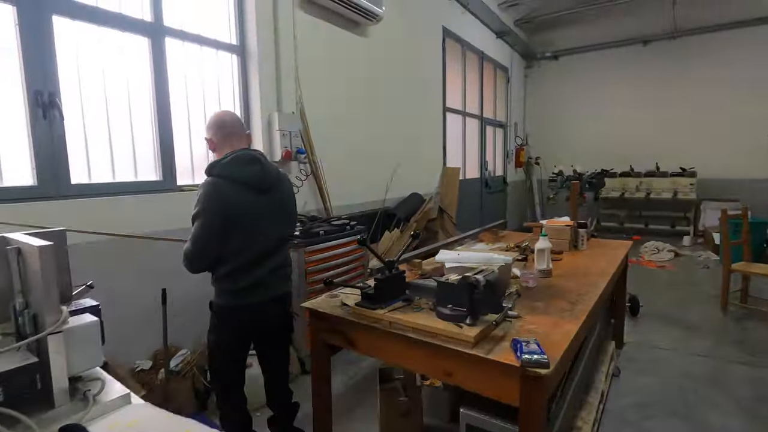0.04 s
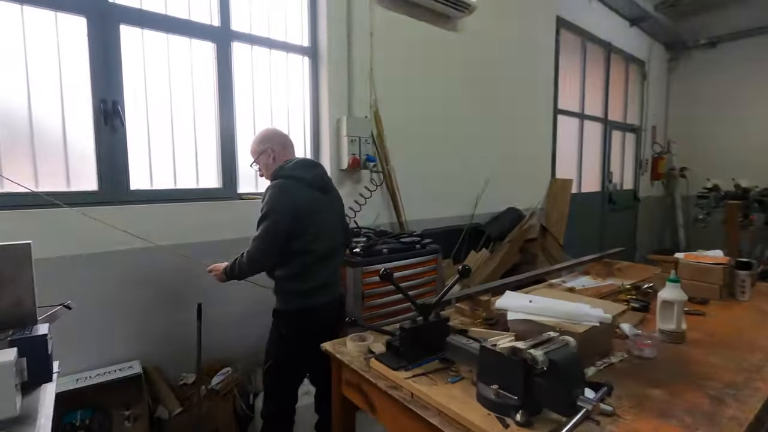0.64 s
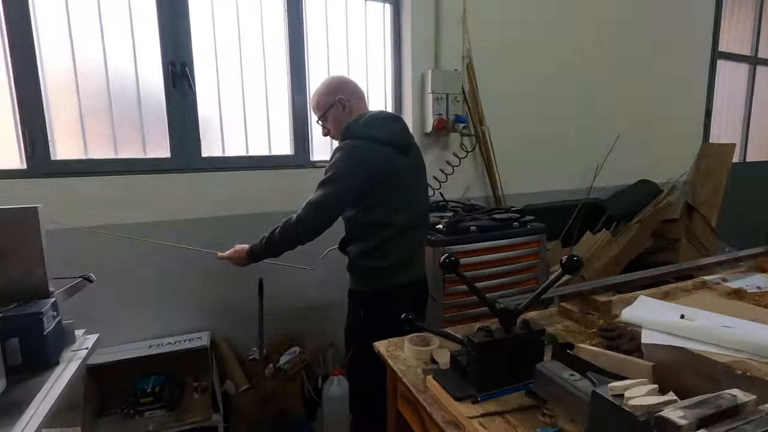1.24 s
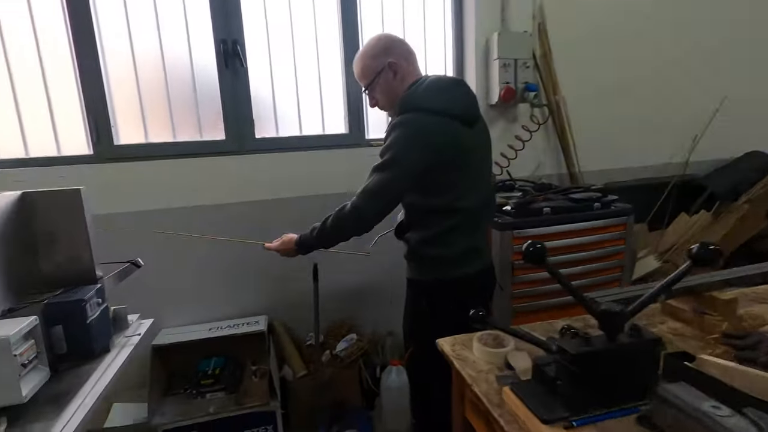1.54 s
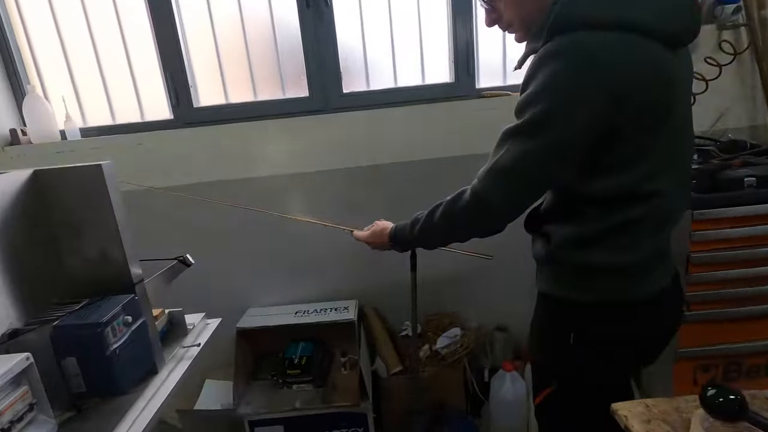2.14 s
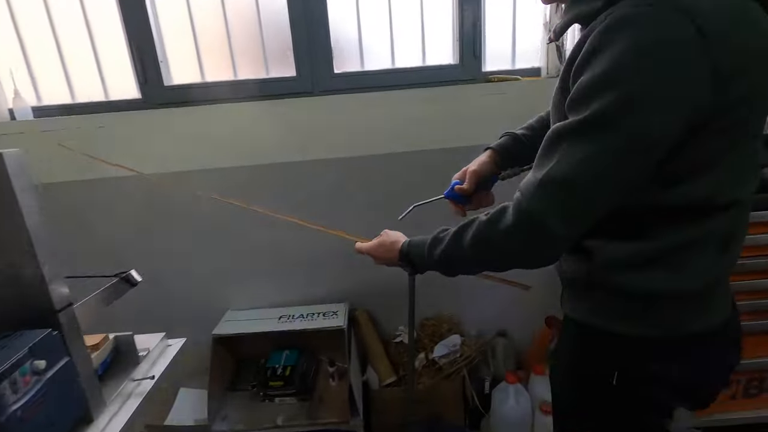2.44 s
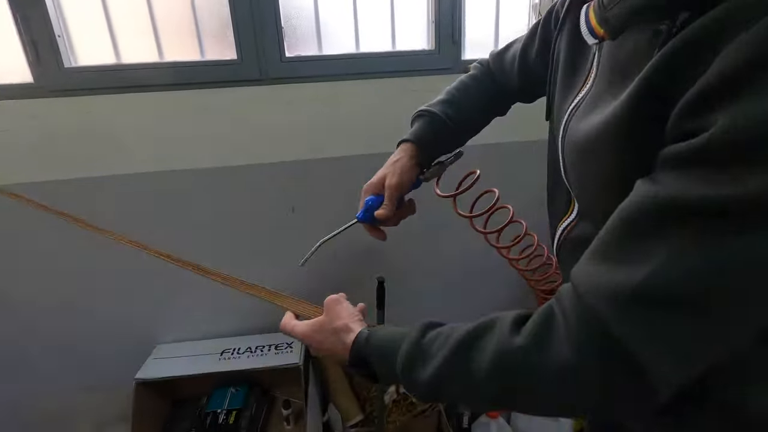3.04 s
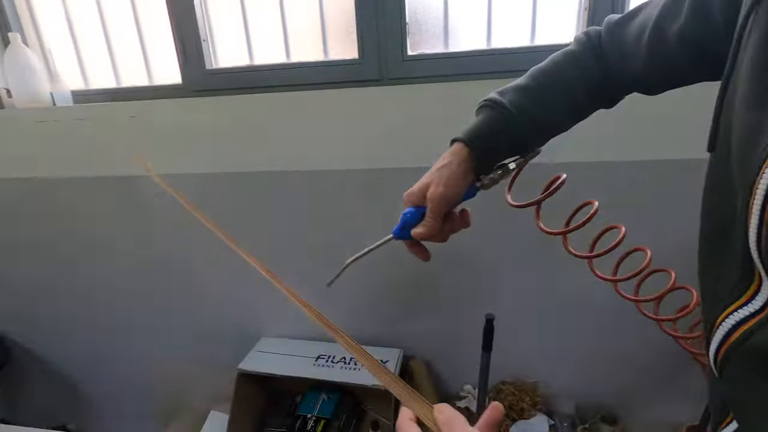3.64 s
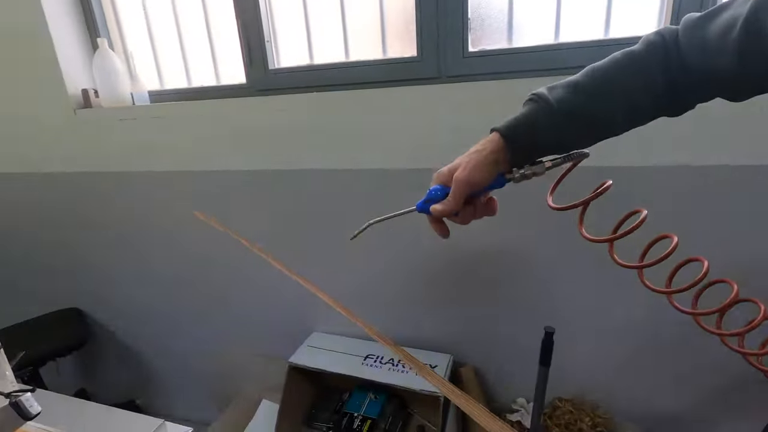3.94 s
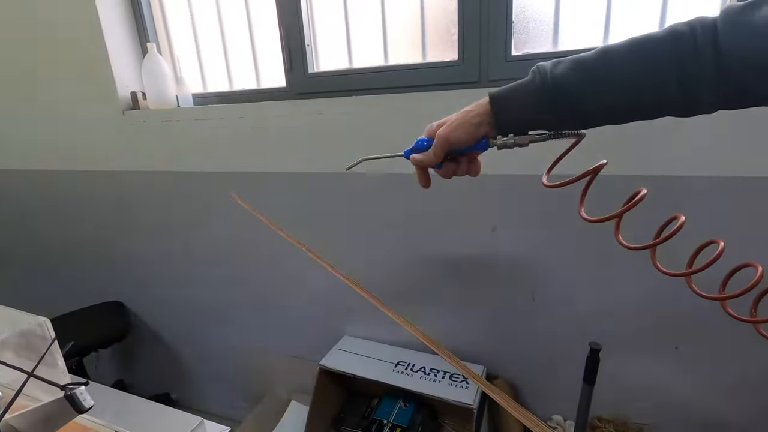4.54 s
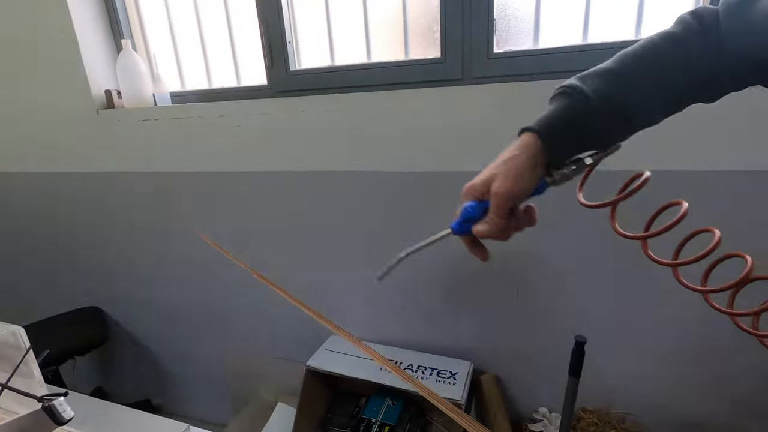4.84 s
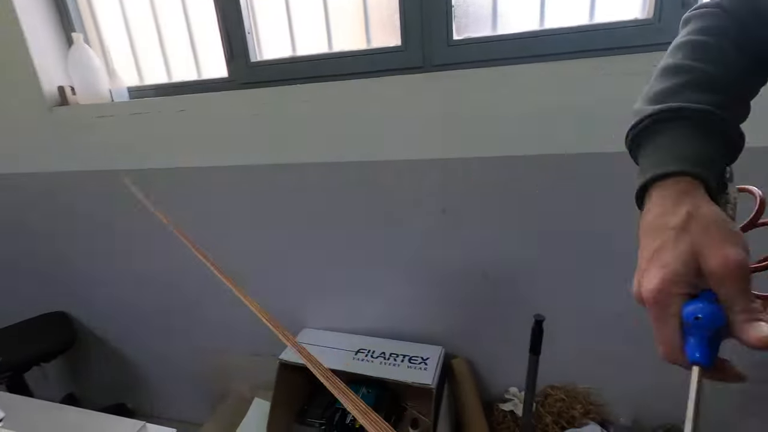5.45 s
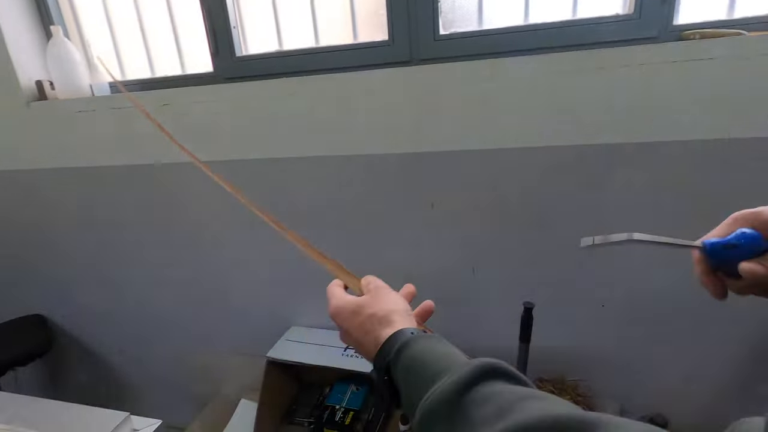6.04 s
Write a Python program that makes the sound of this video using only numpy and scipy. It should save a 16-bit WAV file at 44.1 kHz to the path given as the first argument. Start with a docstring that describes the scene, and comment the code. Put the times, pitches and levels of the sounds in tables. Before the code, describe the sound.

Soft footsteps, sole scuffs and a few light clicks of bamboo come first, over a faint low room drone. Then an air gun starts with a thin leak and blasts steadily for about four seconds, its bright hiss wavering between a rush and a lower roar as it passes over bamboo strips and a hand. Puffs of air thump the nearby microphone late on, and the jet stops with a short workshop echo.

```python
"""First you hear steps and scuffs in a hard-walled workshop, and bamboo strips tapping together.
Then a compressed-air blow gun leaks as its trigger is eased, and blasts as it is pressed home.
Swept along the strips, the jet makes swirls of air: tiny ones hiss at the nozzle, bigger ones rush
across the strips and roar over strips and hand, and the biggest rumble. Stray puffs buffet the
microphone. A low drone lies under it all, and the room rings on when the jet stops."""
import sys
import numpy as np
from scipy import signal
from scipy.io import wavfile
from scipy.ndimage import map_coordinates

SR = 44100
rng = np.random.default_rng(int(sys.argv[2]) if len(sys.argv) > 2 else 0)


def persist_wave(psi):
    """Save psi, clipped to +-1, as 16-bit WAV."""
    counts = np.round(np.clip(psi, -1, 1) * 32767).astype(np.int16)
    wavfile.write(sys.argv[1], SR, np.atleast_2d(counts).T)


N = 277477
TIME = np.arange(N) / SR
CONTROL_STEP = 40   # samples between updates of slow changes
CONTROL_TIME = TIME[::CONTROL_STEP]
PRESS_S, OPEN_S, RELEASE_S, SHUT_S = 1.714, 0.032, 5.984, 0.045   # trigger moments, valve travel times

# how alike the microphone's left and right sides hear a noise: pitch_hz, likeness (0-1)
LIKENESS = [(100, .9), (450, .92), (1200, .98), (2500, .95), (5000, .8), (7000, .72), (10000, .35),
            (14000, .3)]
# which side hears more: pitch_hz, left_minus_right_db
BALANCE = [(200, -1), (1200, -2), (3000, 1), (5000, -1.5), (7500, 2), (10000, -9), (12500, -4.5),
           (15000, -2)]
# the room's low drone (every spectrum gives only a tone colour): pitch_hz, level_db
DRONE_SPECTRUM = [(20, -3), (48, -7), (80, -23), (105, -49), (135, -4), (184, -2), (280, -8.5), (520, -19),
                  (850, -24), (1650, -24), (4000, -26), (8300, -29.5), (10500, -48), (14000, -52)]
# the drone fades as the microphone moves across the room: time_s, level_db
DRONE_LEVEL = [(0, -61), (1.5, -64.5), (6, -68)]
# how long the room rings (a ring time is a fall of 60 dB): pitch_hz, ring_s
ROOM_RING = [(150, 0.83), (600, 1.07), (1500, 1.17), (4000, 0.94), (8000, 0.75), (14000, 0.28)]

# air tumbling over the microphone: pitch_hz, level_db
BUFFET_SPECTRUM = [(20, 1), (55, 4), (110, -2.5), (180, -1), (400, -20.5), (900, -50)]
# puffs on the microphone, faint as it is carried, then from the jet: time_s, length_s, level_db
GUSTS = [(.11, 0.12, -68), (.46, .1, -57), (2.82, 0.063, -50), (3.01, 0.075, -50.5), (3.24, 0.033, -41),
         (3.33, 0.054, -55), (3.46, 0.056, -55), (3.84, 0.068, -58), (4.9, 0.13, -62), (5.15, .1, -41),
         (5.156, 0.034, -30), (5.222, 0.035, -34), (5.29, .05, -53), (5.51, 0.065, -44), (5.64, 0.25, -53),
         (5.79, 0.083, -48), (6.0, 0.042, -53)]

# soles scuff on concrete, each with its own pitch: time_s, length_s, level_db, pitch_hz
SCUFFS = [(0.014, 0.069, -43.5, 2230), (.058, 0.03, -48, 2700), (.14, 0.17, -54.5, 1790),
          (0.387, 0.03, -57, 2800), (.457, 0.047, -51, 3120), (0.65, 0.071, -50, 2480),
          (0.848, 0.05, -55.5, 2000), (.9, 0.066, -49, 1970), (0.954, 0.036, -43.5, 4200),
          (.998, 0.02, -44.5, 1750), (1.035, .05, -51.5, 1700), (1.15, 0.11, -63, 1700)]
# a rubbing sole: pitch_hz, level_db
SCUFF_SPECTRUM = [(800, -18), (1250, -1.5), (1650, -2.5), (2100, -3), (2700, -3), (4200, -6), (6400, -22)]
# grit scrapes under a sole: time_s, length_s, level_db
SCRAPES = [(.02, 0.095, -59), (.3, .02, -63.5), (.43, 0.022, -54.5), (.519, 0.028, -52.5),
           (.59, 0.094, -59), (.955, 0.027, -48.5), (1.005, 0.04, -44), (1.17, 0.063, -63)]
# scraping grit: pitch_hz, level_db
SCRAPE_SPECTRUM = [(200, -3), (350, -5), (600, -0.5), (800, -4.5), (1200, -3), (2000, -10)]
# sleeves swish: time_s, length_s, level_db
SWISHES = [(.02, 0.11, -56.5), (.322, 0.065, -58), (.42, 0.085, -59), (.74, 0.43, -67.5), (.96, 0.082, -58)]
# rubbing cloth: pitch_hz, level_db
SLEEVE_SPECTRUM = [(2000, 2), (4000, 1), (6400, 0), (8200, -3), (10000, -21), (12700, -18), (16000, -32)]
# bamboo strips tap each other: time_s, strength_db
BAMBOO_TAPS = [(0.567, -32.5), (0.625, -34), (0.931, -28.5), (0.938, -33), (0.988, -30.5)]
# the tones of a strip: pitch_hz, level_db, ring_s
BAMBOO_TONES = [(1390, -19, 0.014), (1710, -4.5, 0.0097), (2170, -9.5, .01), (2640, -7.5, 0.0034),
                (3600, -11, 0.0033), (4850, -16, 0.0034)]
# the hose coupling ticks as the gun is picked up: time_s, strength_db
COUPLING_TICKS = [(1.377, -59)]
# the tones of the coupling: pitch_hz, level_db, ring_s
COUPLING_TONES = [(3700, -4, .005), (5230, 2, 0.004), (8500, -1, .01), (10800, -18, 0.0091),
                  (11940, -7, .03)]
# a metal part is bumped: time_s, strength_db
METAL_BUMPS = [(0.988, -52)]
# the faint tones of that part: pitch_hz, level_db, ring_s
METAL_TONES = [(1400, -11, 0.67), (1750, -8, 0.7)]
# footfalls, heel then sole: time_s, strength_db
STEPS = [(0.425, -34), (0.452, -47), (0.508, -35.5)]
# the tones of the floor: pitch_hz, level_db, ring_s
FLOOR_TONES = [(48, -18, 0.16), (157, -8.5, 0.08), (200, -2.5, 0.1), (292, -15, 0.069), (437, -15, 0.034)]

# where the nozzle is heard: time_s, left_delay_ms, left_minus_right_db
NOZZLE_PATH = [(1.5, 0.034, -0.5), (2.2, 0.041, -0.8), (2.8, 0.024, 1.5), (3.15, 0.0086, 0.5),
               (3.37, .002, 1), (3.65, 0.024, 0.5), (5.03, 0.035, -0.2), (5.12, 0.046, -3),
               (5.26, 0.05, -1.5), (5.36, 0.025, 0.5), (5.549, 0.035, -1), (5.999, 0.036, -.5)]
# air leaks through the barely open valve: time_s, level_db
LEAK_LEVEL = [(1.51, -77), (1.55, -54), (1.585, -40.5), (1.615, -42), (1.632, -43.5), (1.655, -37.5),
              (1.705, -41), (1.76, -34.5), (2.1, -27), (2.3, -49)]
# the leaking air: pitch_hz, level_db
LEAK_SPECTRUM = [(630, -18), (1000, -23), (1280, -3), (1700, -5.5), (2400, -2.5), (3200, 0), (4700, -1.5),
                 (6500, -2.5), (8300, -7), (12500, -19), (16000, -28)]
# pitches at which the valve and nozzle tube ring: pitch_hz, width_hz, level_db
TUBE_PEAKS = [(2380, 160, 4), (3660, 180, 3), (4600, 360, 6), (5660, 180, -17)]
# the jet wavers as the hand moves and steadies while held clear: time_s, waver_factor
HAND_MOTION = [(4.1, 1.1), (4.25, 0.35), (4.8, .25), (4.95, 1)]
# the fine hiss at the nozzle: time_s, level_db
HISS_LEVEL = [(1.75, -31), (1.95, -31), (1.97, -29), (2.53, -33.5), (2.66, -26.5), (2.7, -35),
              (2.77, -28.5), (2.85, -36.5), (3.0, -25), (3.09, -34.5), (3.12, -27), (3.16, -30.5),
              (3.21, -26), (3.23, -37.5), (3.24, -28.5), (3.3, -36), (3.32, -31), (3.36, -39.5),
              (3.41, -24.5), (3.42, -28.5), (3.45, -28.5), (3.5, -44.5), (3.58, -38), (3.61, -33.5),
              (3.73, -34.5), (3.81, -26.5), (3.97, -33.5), (4.19, -34.5), (4.73, -32.5), (4.99, -29),
              (5.0, -28.5), (5.06, -34), (5.1, -30.5), (5.27, -27.5), (5.31, -36), (5.49, -30),
              (5.6, -37.5), (5.68, -27), (5.75, -29), (5.79, -36.5), (5.9, -35), (5.92, -33), (5.95, -38),
              (5.98, -30), (6.0, -32)]
# the hiss: pitch_hz, level_db
HISS_SPECTRUM = [(1000, -16), (3000, -15), (5000, 3), (6400, 0), (8200, 3.5), (10000, -6.5), (12900, -6.5),
                 (16000, -46)]
# the rush of the jet, which drops whenever the nozzle turns away: time_s, level_db
RUSH_LEVEL = [(1.75, -22), (1.94, -25.5), (2.0, -22.5), (2.25, -24.5), (2.55, -23), (2.85, -25),
              (3.05, -26), (3.2, -28), (3.23, -30.5), (3.45, -23.5), (3.5, -37.5), (3.578, -35.5),
              (3.603, -26.5), (3.73, -31), (3.79, -26), (3.87, -25.5), (3.975, -26.5), (4.005, -30.5),
              (4.2, -29), (4.7, -29.5), (5.0, -24.5), (5.13, -23), (5.16, -25), (5.295, -26.5),
              (5.32, -29.5), (5.393, -29), (5.412, -27), (5.5, -26), (5.6, -25.5), (5.75, -25),
              (5.81, -25.5), (6.0, -24.5)]
# the rush: pitch_hz, level_db
RUSH_SPECTRUM = [(500, -38), (900, -39), (1500, -12), (2300, -0.5), (3300, 1.5), (4800, 1), (6200, -7.5),
                 (9000, -13)]
# the roar, louder when more air lands on strips and hand: time_s, level_db
ROAR_LEVEL = [(1.75, -38.5), (1.93, -45.5), (2.25, -32), (2.5, -29), (2.8, -27), (3.0, -30.5), (3.2, -29.5),
              (3.44, -35.5), (3.52, -51.5), (3.63, -34), (3.75, -39.5), (3.92, -32), (3.988, -32),
              (4.005, -43), (4.15, -34), (4.25, -39), (4.75, -38.5), (4.92, -33), (5.0, -29), (5.12, -40),
              (5.29, -35), (5.33, -41.5), (5.39, -37), (5.412, -30.5), (5.55, -30), (5.78, -27.5),
              (5.92, -31.5), (5.95, -39.5), (5.98, -30.5)]
# the roar: pitch_hz, level_db
ROAR_SPECTRUM = [(400, -17.5), (640, -9.5), (800, -14.5), (1050, 0), (1650, 3), (2400, 0.5), (4000, -38)]
# peaks that make the roar sound hollow: pitch_hz, width_hz, level_db
HOLLOW_PEAKS = [(689, 44, 1), (1110, 270, -5), (2040, 480, -10.5)]
# the rumble of the wake, the slow, wide end of the jet: time_s, level_db
WAKE_LEVEL = [(1.75, -58), (2.1, -46.5), (2.62, -39), (2.85, -41.5), (3.25, -47), (3.4, -51), (3.53, -63),
              (3.65, -49.5), (3.87, -52.5), (3.98, -42), (4.04, -48.5), (4.12, -41), (4.3, -44.5),
              (4.74, -46), (4.86, -38.5), (4.95, -34.5), (5.05, -43.5), (5.35, -47.5), (5.47, -44),
              (5.62, -36), (5.85, -37), (5.95, -49), (6.0, -34)]
# the wake: pitch_hz, level_db
WAKE_SPECTRUM = [(80, -31), (125, -29), (165, -4), (240, -4.5), (310, 0.5), (400, -2.5), (510, -5.5),
                 (660, 2.5), (820, -1.5), (1300, -7)]
# the jet flicks across a strip, high on an edge, low on a flat: time_s, length_s, lift_db, pitch_hz
WHOOSHES = [(2.115, 0.056, 2.5, 3630), (2.518, 0.02, 3, 606), (2.707, 0.03, 7, 1190),
            (2.792, 0.064, 3, 3000), (2.898, 0.033, 8, 700), (2.986, 0.16, 1.5, 5000),
            (3.152, 0.05, 7, 4800), (3.204, 0.027, 7.5, 7000), (3.256, 0.021, 7, 5500),
            (3.323, 0.04, 7.5, 4800), (3.384, 0.03, 3.5, 4600), (3.428, 0.047, -0.5, 5000),
            (3.602, 0.042, 4.5, 3730), (3.676, 0.048, 7, 2480), (3.807, 0.15, 3.5, 7000),
            (3.975, 0.035, 4, 1400), (4.1, 0.041, 6, 970), (5.055, 0.15, 3.5, 3020),
            (5.202, 0.027, 7, 4500), (5.282, 0.058, 6.5, 3900), (5.452, 0.087, 6.5, 3520),
            (5.536, 0.04, 4.5, 1200), (5.708, .07, 5.5, 5500), (5.763, 0.022, 4.5, 2400),
            (5.837, 0.038, 4, 450), (5.917, 0.028, 6, 3200), (5.989, .035, 5, 3270)]
# the ring of the gap between nozzle and strips glides: start_s, end_s, start_hz, end_hz, lift_db
GAP_SWEEPS = [(2.466, 2.633, 686, 605, 5), (2.67, 2.73, 1100, 1900, 1.5), (2.785, 2.905, 3200, 1200, 1.8),
              (2.913, 3.062, 2380, 5000, 4), (3.35, 3.422, 3480, 4500, 5), (3.78, 3.92, 4670, 3480, 3.5),
              (3.923, 3.995, 3000, 1400, 2), (4.84, 4.97, 604, 760, 3), (4.947, 5.146, 1340, 5000, 2),
              (5.407, 5.512, 2400, 2800, 4), (5.513, 5.69, 1730, 1550, 5), (5.752, 5.857, 2200, 480, 3)]


def from_db(db):
    """Turn decibels into a gain to multiply by."""
    return 10 ** (np.asarray(db) / 20)


def rms_one(x):
    """Scale a signal so that its average strength (rms) is 1."""
    return x / np.sqrt(np.mean(x ** 2) + 1e-20)


def at_hz(points, hz):
    """Read a table at one pitch, giving every octave equal room."""
    pitches, values = np.transpose(points)
    return np.interp(np.log(hz), np.log(pitches), values)


def curve(rows):
    """Join a table's points with straight lines, read at the control times."""
    return np.interp(CONTROL_TIME, *np.transpose(rows))


def held(control):
    """Hold each control value until the next, giving one value a sample."""
    return np.repeat(control, CONTROL_STEP)[:N]


def drift(rate_hz):
    """A smooth random wobble of size 1 at the control times; a higher rate wobbles faster."""
    memory = np.exp(-2 * np.pi * rate_hz * CONTROL_STEP / SR)
    warm_up = 2000
    white = rng.standard_normal(len(CONTROL_TIME) + warm_up)
    return rms_one(signal.lfilter([1], [1, -2 * memory, memory * memory], white)[warm_up:])


def wander(spread_db, rate_hz):
    """A factor that wavers around 1 by chance."""
    return held(from_db(spread_db * drift(rate_hz)))


def bell(offset, width):
    """A smooth hump of height 1, its width taken at half height."""
    return .5 ** ((2 * offset / width) ** 2)


def swells(events):
    """The gain of short sounds that each swell and fade."""
    return held(sum(from_db(db) * bell(CONTROL_TIME - s, length) for s, length, db in events))


def delayed(x, seconds):
    """Make a signal arrive later, by a delay that can change."""
    return map_coordinates(x, [np.arange(N) - seconds * SR], order=3)


def bands(low_hz, high_hz):
    """Filters that cut a range into slices a third of an octave wide, each with its middle pitch."""
    centres = 20 * 2 ** (np.arange(30) / 3)
    half = 2 ** (1 / 6)
    return [(hz, signal.butter(2, [hz / half, hz * half], "band", fs=SR, output="sos"))
            for hz in centres if low_hz / half <= hz <= high_hz * half]


def noise(spectrum, flutter_db, patchy_db, flutter_hz=25, shared=1, stretch=1):
    """Stereo noise whose bands waver together (flutter) and alone (patchy); stretch moves its pitch."""
    out = np.zeros((2, N), np.float32)
    white = rng.standard_normal((2, 2, N), dtype=np.float32)
    together = from_db(flutter_db * drift(flutter_hz)) / np.sqrt(stretch)
    for k, (hz, band) in enumerate(bands(spectrum[0][0], spectrum[-1][0])):
        alike = np.clip(at_hz(LIKENESS, hz) * shared, 0, 1)   # the two sides share less of a far source
        mid, side = np.sqrt(1 + alike), np.sqrt(1 - alike)
        balance = from_db(at_hz(BALANCE, hz) * np.array([[.5], [-.5]]))
        to_stereo = np.array([[mid, side], [mid, -side]]) * balance
        gain = together * from_db(at_hz(spectrum, hz / stretch) + patchy_db * drift(9.9))
        band_noise = np.float32(signal.sosfilt(band, white[k % 2]))
        out += held(np.float32(gain)) * (np.float32(to_stereo) @ band_noise)
    return rms_one(out.astype(float))


def coloured(x, peaks):
    """Make a noise ring at a few pitches, then scale it to strength 1."""
    out = x.copy()
    for hz, width_hz, db in peaks:
        out += from_db(db) * signal.lfilter(*signal.iirpeak(hz, hz / width_hz, fs=SR), x)
    return rms_one(out)


def struck(blows, tones, scatter_db):
    """Each blow sets all of an object's tones ringing; scatter varies their strengths by chance."""
    times_s, blow_db = np.transpose(blows)
    strengths = from_db(blow_db[:, None] + scatter_db * rng.standard_normal((len(blows), len(tones))))
    out = np.zeros(N)
    for k, (hz, tone_db, ring_s) in enumerate(tones):
        clicks = np.full(N, 1e-18)
        clicks[(times_s * SR).astype(int)] = strengths[:, k] * from_db(tone_db) * (-1) ** k
        decay, turn = from_db(-60 / (ring_s * SR)), 2 * np.pi * hz / SR
        out += signal.lfilter([0, np.sin(turn)], [1, -2 * decay * np.cos(turn), decay * decay], clicks)
    return out


def room_drone():
    """The room's low, wavering drone slowly fades."""
    level = held(from_db(curve(DRONE_LEVEL)))
    return level * noise(DRONE_SPECTRUM, flutter_db=2.5, patchy_db=3.0, shared=0.27)


def room_response(build_s):
    """The room's answer to a click: echoes build up, then die away, the highest pitches first."""
    t = TIME[:SR]
    white = rng.standard_normal((2, 2, len(t)))
    tail = np.zeros((2, len(t)))
    for k, (hz, band) in enumerate(bands(100, 16000)):
        mid, side = signal.sosfilt(band, white[k % 2])
        alike = 0.8 / (1 + (hz / 3000) ** 2)   # the two sides are close and hear long waves alike
        stereo = np.sqrt(1 + alike) * mid + np.sqrt(1 - alike) * np.array([side, -side])
        tail += stereo * from_db(-60 * t / at_hz(ROOM_RING, hz))
    return rms_one(tail * (1 - np.exp(-t / build_s))) / np.sqrt(len(t))


def workshop_echoes(x, left_db, right_db, first_echo_s, sway_db, patterns=4):
    """As source and microphone move, paths stretch and one pattern of echoes gives way to the next."""
    sent = delayed(x.mean(axis=0), first_echo_s * wander(sway_db, 0.786))
    place = np.linspace(0, patterns - 1, N)
    out = np.zeros((2, N))
    for k in range(patterns):
        share = np.sqrt(np.clip(1 - abs(place - k), 0, 1))
        out += signal.oaconvolve([share * sent], room_response(build_s=0.013), axes=1)[:, :N]
    return from_db([[left_db], [right_db]]) * out


def draught(left_db, right_db, steady_db):
    """Air tumbles over the microphone: puffs, and a faint flow while the jet is on."""
    strength = swells(GUSTS) + from_db(steady_db) * valve_opening()
    buffet = noise(BUFFET_SPECTRUM, flutter_db=4.5, patchy_db=3.5, shared=0.84)
    return strength * from_db([[left_db], [right_db]]) * buffet


def soles_and_sleeves():
    """Rubbing makes noise: dragged soles sing a little, grit scrapes and cloth swishes."""
    sole = noise(SCUFF_SPECTRUM, flutter_db=2.0, patchy_db=0.0, flutter_hz=240, shared=0.88)
    width_hz, sing_db = 520, 2.5
    scuffs = sum(swells([(s, length, db)]) * coloured(sole, [(hz, width_hz, sing_db)])
                 for s, length, db, hz in SCUFFS)
    grit = noise(SCRAPE_SPECTRUM, flutter_db=3.0, patchy_db=3.0, flutter_hz=52)
    cloth = noise(SLEEVE_SPECTRUM, flutter_db=1.5, patchy_db=1.5, flutter_hz=80, shared=.55)
    scrapes, swishes = swells(SCRAPES) * grit, swells(SWISHES) * cloth
    return from_db(-1.5) * scuffs + from_db(-0.5) * scrapes + from_db(1.0) * swishes


def bamboo_taps():
    """The carried strips knock together and ring very briefly."""
    return from_db(2.0) * struck(BAMBOO_TAPS, BAMBOO_TONES, scatter_db=4.0)


def metal_parts():
    """The hose coupling ticks, and a bumped metal part rings on faintly."""
    tick = struck(COUPLING_TICKS, COUPLING_TONES, scatter_db=4.0)
    return tick + struck(METAL_BUMPS, METAL_TONES, scatter_db=0.0)


def footsteps():
    """Heel and sole strike the floor, which thuds."""
    return from_db(-2.0) * struck(STEPS, FLOOR_TONES, scatter_db=1.5)


def near_echoes(air, echo_db, nearest_s, sway_db, count=4):
    """Echoes off hand, body and wall cancel some pitches, and those slide as the nozzle moves."""
    out = air.copy()
    for k in range(count):
        echo_s = nearest_s * 1.8 ** k * wander(sway_db, 1.19)
        out += from_db(echo_db) * np.array([np.interp(TIME - echo_s, TIME, x) for x in air])
    return out


def nozzle_direction(air):
    """Where the nozzle is makes one side hear it later, and louder or softer, than the other."""
    times_s, delay_ms, pan_db = np.transpose(NOZZLE_PATH)
    left = delayed(air[0], np.interp(TIME, times_s, delay_ms) / 1000)
    pan = from_db(np.interp(TIME, times_s, pan_db) / 2)
    return np.array([left * pan, air[1] / pan])


def valve_leak():
    """Air squeezes past the barely open valve and rings the nozzle tube until the flow settles."""
    level_db = np.interp(TIME, *np.transpose(LEAK_LEVEL), left=-np.inf, right=-np.inf)
    air = noise(LEAK_SPECTRUM, flutter_db=0.2, patchy_db=4.0)
    return from_db(level_db + 1.0) * coloured(air, TUBE_PEAKS)


def valve_opening():
    """How far the valve stands open, 0-1; it takes a moment to open and to shut."""
    return np.clip((TIME - PRESS_S) / OPEN_S, 0, 1) * np.clip(1 - (TIME - RELEASE_S) / SHUT_S, 0, 1)


def swirl_gain(levels, hz, unsteady_db, reach_octaves=2.8, shade=0.14):
    """Gain of the swirls near one pitch: whooshes close to it lift them, far-off ones dim them."""
    level_db = curve(levels)
    for s, length, lift_db, pitch_hz in WHOOSHES:
        share = (1 + shade) * bell(np.log2(hz / pitch_hz), reach_octaves) - shade
        level_db += lift_db * share * bell(CONTROL_TIME - s, length)
    return from_db(level_db + unsteady_db * drift(5.6))   # the hand is never quite still


def gap_sweeps(air, sharpness=3.9, fade_s=0.029, block=128):
    """The gap between nozzle and strips opens or closes, so a broad peak glides through the noise."""
    out = air.copy()
    for start_s, end_s, start_hz, end_hz, lift_db in GAP_SWEEPS:
        state = np.zeros((2, 2))
        for i in range(int((start_s - fade_s) * SR), int((end_s + fade_s) * SR), block):
            now_s = i / SR
            progress = np.clip((now_s - start_s) / (end_s - start_s), 0, 1)
            hz = start_hz * (end_hz / start_hz) ** progress
            fade = np.clip(.5 + min(now_s - start_s, end_s - now_s) / fade_s, 0, 1)
            peak = signal.iirpeak(hz, sharpness, fs=SR)
            band, state = signal.lfilter(*peak, air[:, i:i + block], zi=state)
            out[:, i:i + block] += (from_db(lift_db * fade) - 1) * band
    return out


def air_jet():
    """Tiny swirls hiss at the nozzle, bigger ones off the strips rush and roar, and the wake rumbles."""
    motion = curve(HAND_MOTION)
    hiss_gain = from_db(curve(HISS_LEVEL) + 0.58 * motion * drift(19))
    rush_gain = swirl_gain(RUSH_LEVEL, hz=3320, unsteady_db=0.37 * motion)
    roar_gain = swirl_gain(ROAR_LEVEL, hz=1400, unsteady_db=0.6 * motion)
    wake_gain = swirl_gain(WAKE_LEVEL, hz=500, unsteady_db=0.88 * motion)
    rush_pitch = 0.92 * (rush_gain / roar_gain) ** 0.1   # the rush sinks as the roar gains on it
    hiss = noise(HISS_SPECTRUM, flutter_db=0.23 * motion, patchy_db=1.16 * motion)
    hiss = signal.sosfilt(signal.butter(6, 14300, fs=SR, output="sos"), hiss)   # trim the very top
    rush = noise(RUSH_SPECTRUM, flutter_db=0.0, patchy_db=motion, stretch=rush_pitch)
    roar = noise(ROAR_SPECTRUM, flutter_db=motion, patchy_db=1.5 * motion)
    wake = noise(WAKE_SPECTRUM, flutter_db=-0.5, patchy_db=2.25)
    air = held(hiss_gain) * from_db(3.0) * hiss
    air += held(rush_gain) * from_db(-0.17) * rush
    air += held(roar_gain) * from_db(-0.37) * coloured(roar, HOLLOW_PEAKS)
    air += held(wake_gain) * from_db(-0.36) * wake
    return valve_opening() * gap_sweeps(air)


def scene():
    """Mix the blow gun and the walking with the room's echoes, its drone and the draught."""
    blow_gun = air_jet() + valve_leak()
    air = from_db(0.1) * near_echoes(blow_gun, echo_db=-12.5, nearest_s=.0012, sway_db=0.9)
    rustle = soles_and_sleeves() + bamboo_taps() + metal_parts()
    thuds = footsteps()
    # the wake's rumble is heard only nearby and hardly fills the room
    far_air = signal.sosfilt(signal.butter(2, 320, "high", fs=SR, output="sos"), air)
    into_room = far_air + from_db(9.5) * rustle + from_db(10.0) * thuds
    room = workshop_echoes(into_room, left_db=-15.5, right_db=-18.0, first_echo_s=.006, sway_db=1.5)
    drone = room_drone()
    puffs = draught(left_db=-4, right_db=2.5, steady_db=-90)
    return nozzle_direction(air) + rustle + thuds + room + drone + puffs


def record(dry):
    """Cut away the very highest pitches steeply."""
    cutoff_hz = 15700
    return signal.sosfilt(signal.ellip(12, .1, 90, cutoff_hz, fs=SR, output="sos"), dry)


dry = scene()
out = record(dry)
persist_wave(out)
```